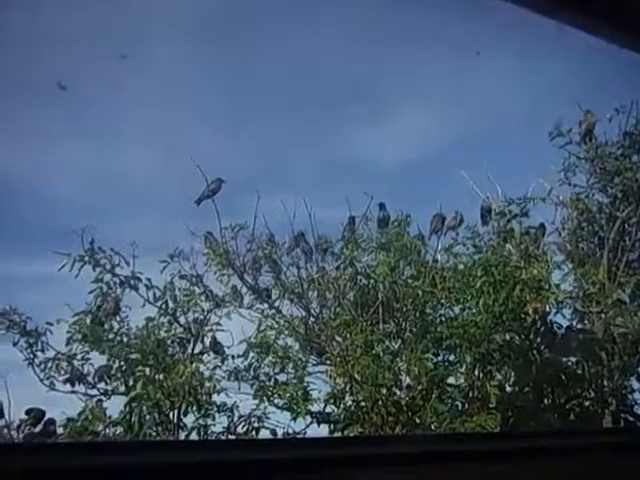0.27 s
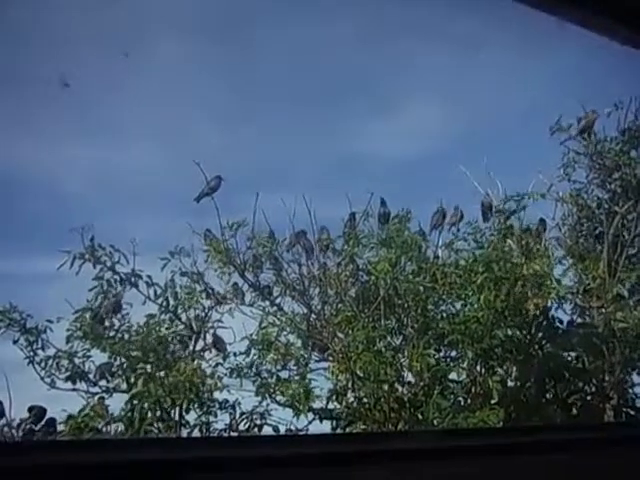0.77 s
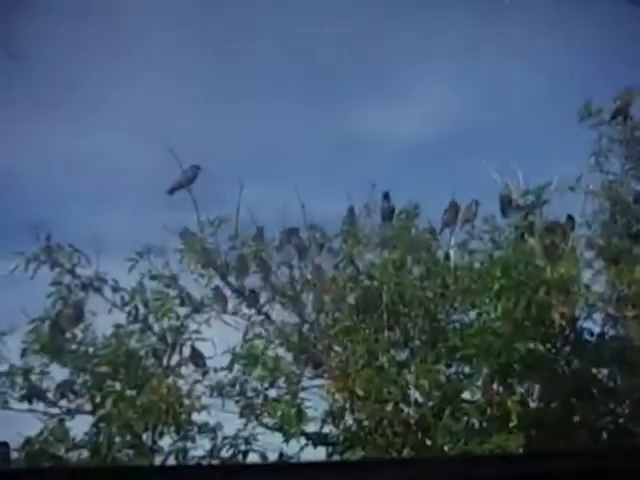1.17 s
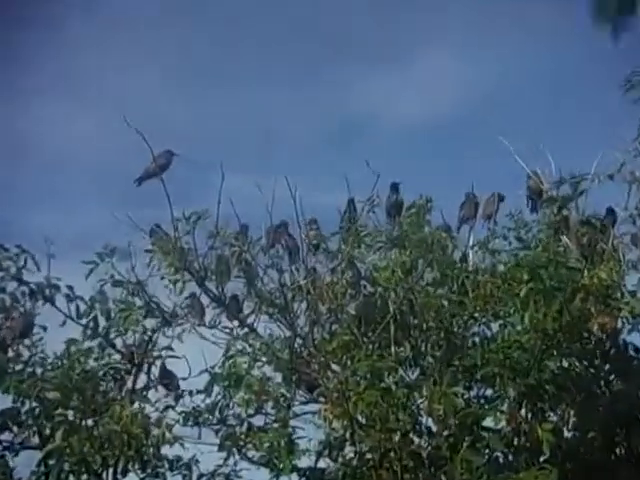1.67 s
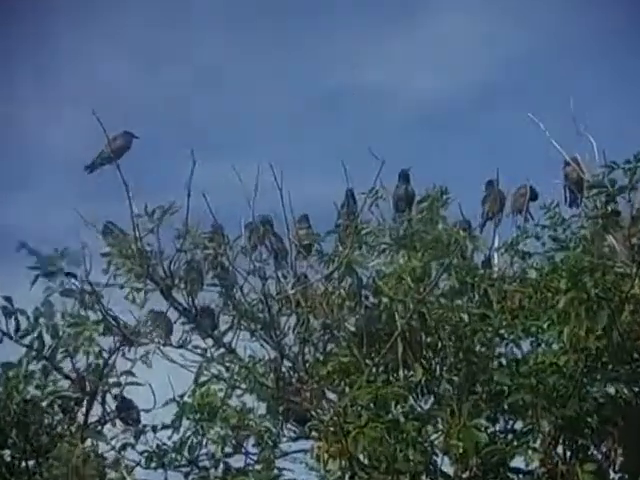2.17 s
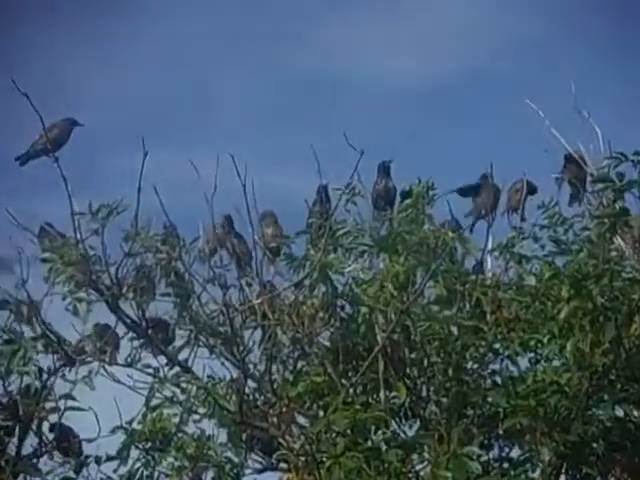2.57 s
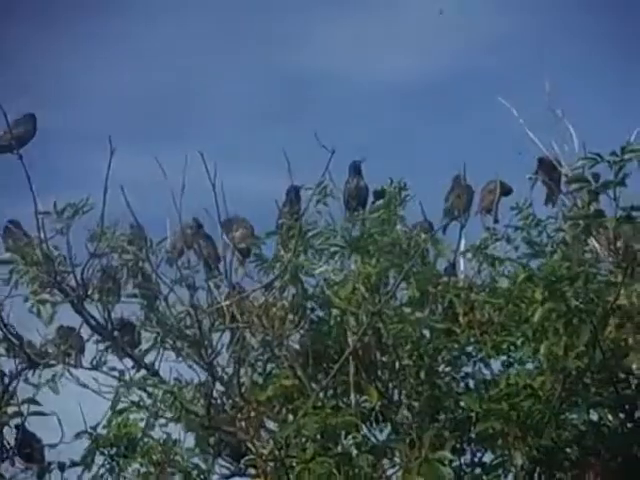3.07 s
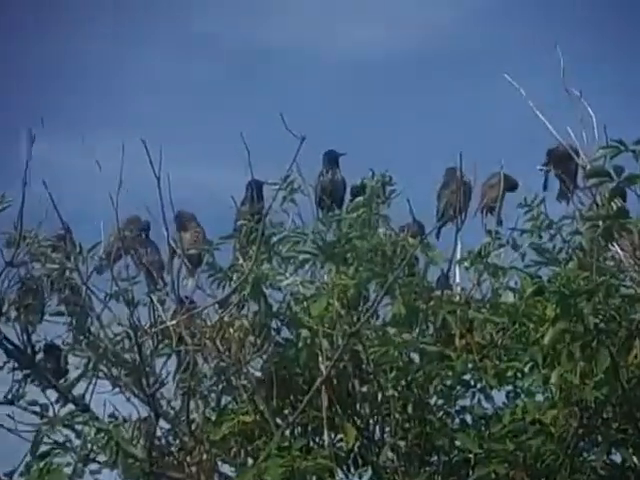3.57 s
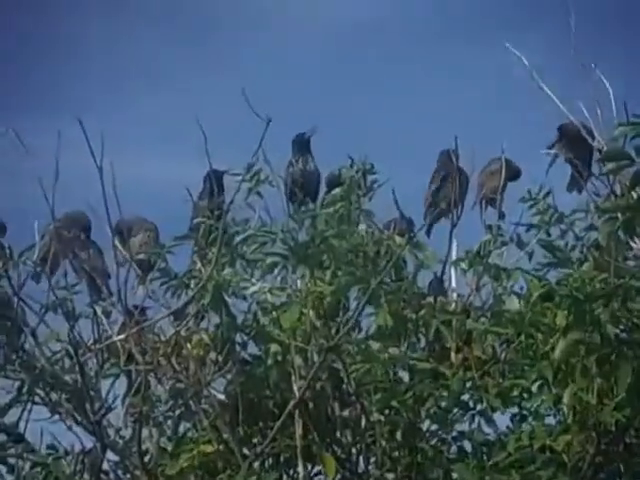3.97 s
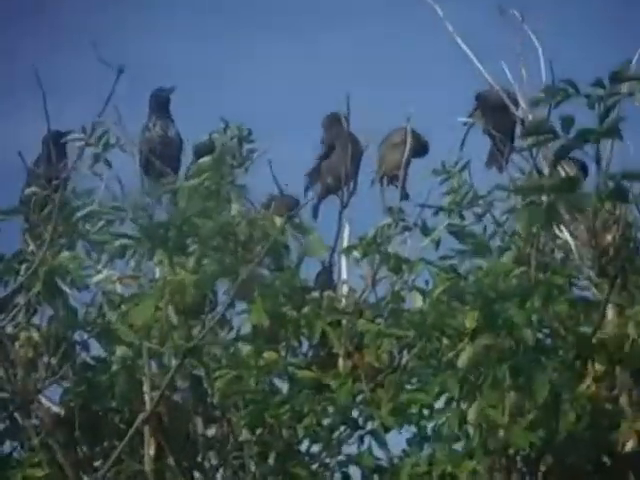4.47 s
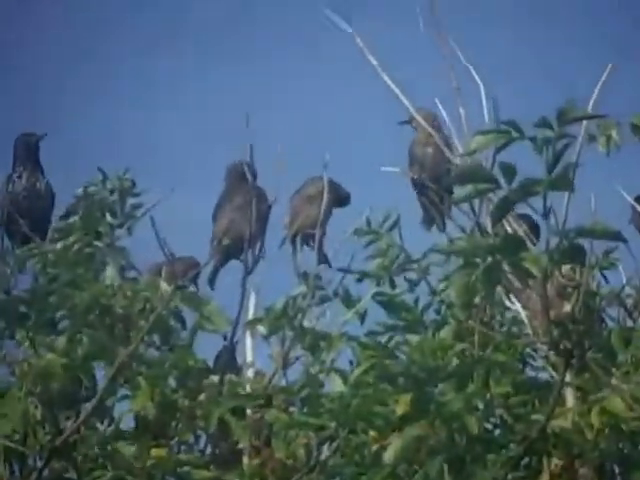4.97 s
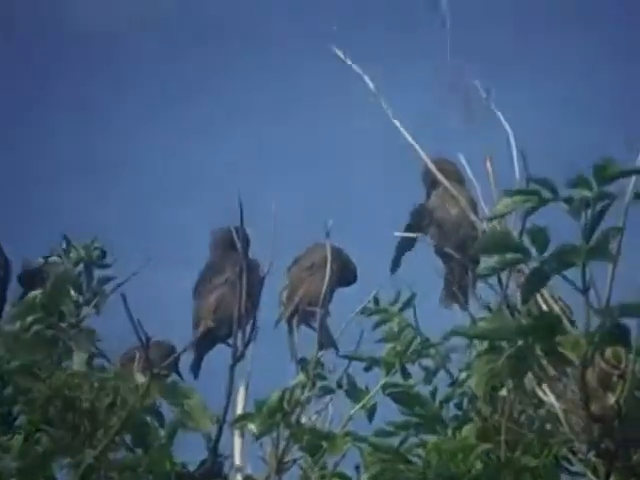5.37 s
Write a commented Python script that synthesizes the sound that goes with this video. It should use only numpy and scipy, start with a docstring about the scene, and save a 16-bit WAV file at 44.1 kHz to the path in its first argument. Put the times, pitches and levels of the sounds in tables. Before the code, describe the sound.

A large flock of starlings chatters in a bushy tree outdoors for the whole five and a half seconds. Countless short chirps blend into a dense, bright babble, slightly softened by the leaves. Thin high whistles, a few lower sliding whistles, harsh rasps and hoarse falling squawks stand out throughout. Underneath are a soft open-air rumble and a faint, low engine hum that weakens after about 3 seconds. Close to the single microphone, a hand-held camera knocks lightly between 0.2 and 0.4 seconds, with a sharp, loud button click at 0.4. Its zoom motor gives a very faint, thin, high whine from 1 to 2.5 seconds. More knocks come at 2.3 and 2.4 seconds, a second sharp click at 2.7, then knocks at 3.1, 3.4 and 3.8. After that the handling stops and the birds keep chattering to the end.

```python
"""In a bushy tree, a flock of starlings chatters: gliding whistles and harsh rasps over a babble of
many more birds. Modulation in the syrinx roughens the whistles, a throat resonance shapes the rasps,
and leaves scatter every call into weak echoes. An engine hums faintly under the rumble of open air.
Close to its single microphone, a hand-held camera knocks, clicks and whines as it zooms."""
import sys
import numpy as np
from scipy import signal
from scipy.fft import rfft, irfft
from scipy.io import wavfile
from scipy.ndimage import uniform_filter1d, minimum_filter1d

SR = 44100
rng = np.random.default_rng(int(sys.argv[2]) if len(sys.argv) > 2 else 0)


def persist_wave(psi):
    """Save psi, clipped to +-1, as 16-bit WAV."""
    counts = np.round(np.clip(psi, -1, 1) * 32767).astype(np.int16)
    wavfile.write(sys.argv[1], SR, np.atleast_2d(counts).T)


N = 247401
TIME = np.arange(N) / SR

# Relative levels of the flock's low and high bands: time_s, chatter_db, squeak_db
FLOCK_LEVELS = [(0.0, -32.5, -30), (0.22, -35.5, -38), (0.43, -33.5, -39.5), (0.69, -32.5, -31.5),
                (1.11, -35.5, -36.5), (1.72, -32, -33.5), (2.24, -33, -35), (2.4, -34, -34.5),
                (2.9, -36.5, -34.5), (3.21, -34.5, -36.5), (3.62, -35.5, -36.5), (3.84, -33, -35.5),
                (4.23, -32.5, -33), (4.93, -33, -35.5), (5.29, -36, -35), (5.6, -32, -37)]
# Spectral envelope of the flock: frequency_hz, gain_db
FLOCK_SPECTRUM = [(600, -18), (1000, -11), (1500, -14), (2100, -6.5), (2700, -1.5), (3400, -4), (5000, 2.5),
                  (6300, 1), (7800, 4.5), (9000, -3.5), (10300, -5.5), (12500, -7), (15000, -56)]
# Running state of the engine: time_s, firing_hz, fundamental_gain_db
ENGINE_STATE = [(0, 71.36, -2), (2.2, 71.3, 0.5), (3.6, 71.03, -10), (5.6, 69.67, -14)]
# Harmonics of the firing rate: order, base_level_db
ENGINE_ORDERS = [(1, -46), (2, -46.5), (3, -44)]
# Spectral envelope of open air and distant rumble: frequency_hz, gain_db
AIR_SPECTRUM = [(15, -2), (30, 5.5), (55, -0.5), (100, -5), (180, -9), (280, -10.5), (400, -17), (700, -22),
                (5000, -17), (11000, -36.5), (15500, -30.5)]
# Harsh calls: start_s, end_s, resonance_hz, level_db
RASP_CALLS = [(0.08, 0.152, 5180, -31), (0.088, 0.142, 7630, -34), (0.598, 0.642, 4690, -27),
              (0.601, 0.748, 6780, -33.5), (0.719, 0.769, 5470, -26), (1.053, 1.099, 4610, -28),
              (1.29, 1.44, 7570, -28.5), (2.091, 2.127, 4970, -27.5), (2.279, 2.396, 8480, -27.5),
              (3.171, 3.422, 3240, -36.5), (3.36, 3.447, 5980, -32), (3.697, 3.781, 7290, -25.5),
              (3.957, 4.097, 5730, -35), (4.209, 4.307, 2690, -31.5), (4.612, 4.712, 7100, -32),
              (4.803, 4.845, 6620, -29.5), (5.188, 5.316, 4870, -32.5), (5.215, 5.282, 7570, -28)]
# Hoarse falling calls: start_s, end_s, pitch_hz, fall_octaves, level_db
SQUAWK_CALLS = [(0.123, 0.15, 7300, 0.36, -27), (0.22, 0.256, 4680, .2, -37),
                (1.149, 1.23, 4570, 0.56, -39), (1.613, 1.642, 5720, 0.59, -24),
                (1.834, 1.937, 4560, 0.93, -27.5), (1.963, 2.002, 2780, .43, -34),
                (2.253, 2.399, 4920, 0.36, -29), (2.436, 2.517, 3600, 0.266, -35),
                (4.403, 4.498, 4220, 0.85, -26.5)]
# Clear low whistles, each a straight slide: start_s, end_s, pitch_hz, glide_hz, level_db
LOW_WHISTLES = [(0.469, 0.512, 1995, -380, -26.5), (1.143, 1.179, 1436, 75, -41.5),
                (1.561, 1.621, 3450, -360, -30.5), (2.241, 2.326, 2640, 60, -27.5),
                (3.048, 3.133, 1050, -90, -47), (3.612, 3.703, 2356, 253, -34),
                (4.549, 4.855, 1365, 288, -40), (4.832, 5.003, 1602, 230, -42),
                (5.501, 5.554, 1756, -380, -32.5)]
# Thin high whistles, each a shallow arch: start_s, end_s, pitch_hz, glide_hz, level_db, roughness_ratio
HIGH_WHISTLES = [(0.67, 1.0, 7830, -600, -33, 0.12), (0.739, 0.796, 7660, 802, -24.5, 0.17),
                 (1.071, 1.176, 9050, 450, -39.5, 0.53), (1.487, 1.625, 8270, 509, -29, 0.37),
                 (1.63, 1.756, 7960, 250, -27, 0.22), (1.767, 1.902, 8120, 500, -34, 0.46),
                 (1.957, 2.09, 9700, -400, -33, .3), (2.075, 2.398, 9150, -650, -32, 0.66),
                 (2.427, 2.526, 7840, 1303, -28.5, .05), (2.511, 2.626, 8000, 0, -31, 0.31),
                 (2.647, 2.749, 7200, -600, -25.5, 0.42), (2.762, 2.94, 9220, -350, -34.5, 0.7),
                 (2.786, 2.957, 8750, 702, -29.5, 0.29), (2.939, 3.055, 8750, -100, -28, 0.2),
                 (3.371, 3.425, 7030, -150, -26.5, 0.3), (3.541, 3.634, 8230, -1000, -27.5, 0.04),
                 (3.66, 3.811, 8570, -250, -27, .06), (3.772, 3.86, 8310, -280, -22, 0.26),
                 (3.838, 3.917, 8170, -100, -20, 0.22), (4.136, 4.339, 6990, 1286, -30, 0.43),
                 (4.438, 4.628, 8380, 509, -34, 0.34), (4.695, 4.827, 8170, 456, -34.5, .2),
                 (5.085, 5.192, 8600, 204, -37, 0.42), (5.29, 5.426, 8530, -80, -44.5, .05),
                 (5.496, 5.61, 8880, 304, -32.5, 0.38)]
# Modes of the camera's shell: frequency_hz, gain_db, t60_s
SHELL_MODES = [(482, -20.5, 0.057), (830, -13.5, 0.023), (1110, -7.5, 0.015), (1284, -11.5, 0.027),
               (2007, -7.5, 0.021), (3740, -6.5, 0.015)]
# Spectral envelope of a tick or snap on the camera: frequency_hz, gain_db
CONTACT_SPECTRUM = [(300, -25), (1500, -14), (3500, -7.5), (6000, -4.5), (8000, -1), (9500, -9),
                    (12000, -23.5), (16000, -32)]
# Impacts on the camera body: start_s, thump_gain_db, shell_gain_db, tick_gain_db
BODY_KNOCKS = [(0.2166, -26.5, -36, -35), (0.2724, -17, -23, -26), (0.397, -16, -15.5, -18),
               (2.264, -21, -8, -19.5), (2.4437, -16.5, -21.5, -18.5), (2.7567, -14.5, -17, -10),
               (3.1445, -13.5, -14.5, -15.5), (3.411, -11, -12.5, -12), (3.802, -11.5, -12.5, -11)]
# Presses of a camera button: start_s, gain_db
BUTTON_PRESSES = [(.3880, -1.5), (2.7372, -1.5)]
# Runs of the zoom motor: start_s, end_s, pitch_hz, level_db
ZOOM_RUNS = [(1.013, 1.407, 9640, -45.5), (1.409, 2.55, 8790, -44)]


def gain_of(db):
    """Amplitude ratio of a level in decibels."""
    return 10 ** (np.asarray(db) / 20)


def unit_rms(x):
    """Normalisation to an rms of 1."""
    return x / np.sqrt(np.mean(x ** 2) + 1e-20)


def add(mix, start_s, sound):
    """Superposition: a sound joins the mix at its start time."""
    part = mix[max(round(start_s * SR), 0):][:len(sound)]
    part += sound[:len(part)]


def coloured(x, envelope):
    """Spectral shaping by an envelope interpolated over log frequency."""
    hz, db = np.transpose(envelope)
    f = np.fft.rfftfreq(len(x), 1 / SR)
    return irfft(rfft(x) * gain_of(np.interp(np.log(f + 1), np.log(hz), db)), len(x))


def wander(rate_hz):
    """Random modulation: low-pass Gaussian noise of rms 1."""
    f = np.fft.rfftfreq(N, 1 / SR)
    return unit_rms(irfft(rfft(rng.standard_normal(N)) * np.exp(-.5 * (f / rate_hz) ** 2), N))


def phase_of(hz):
    """Phase in radians, the time integral of instantaneous frequency."""
    return 2 * np.pi * np.cumsum(hz) / SR


def span(start, end):
    """Sample indices of an event, and its normalised time u from 0 to 1."""
    first = round(start * SR)
    at = np.arange(first, max(round(end * SR), first + 64))
    return at % N, np.linspace(0, 1, len(at))


def foliage(x, t60_s, wet_db, echoes_per_s=2000):
    """Scattering: leaves and branches follow the direct sound with a decaying spray of echoes."""
    t = np.arange(SR // 4) / SR
    taps = rng.standard_normal(len(t)) * (rng.random(len(t)) < echoes_per_s / SR)
    taps *= gain_of(-60 * t / t60_s)
    taps *= gain_of(wet_db) / np.linalg.norm(taps)
    taps[0] = 1  # direct path
    return signal.fftconvolve(x, taps) / np.hypot(1, gain_of(wet_db))


def chirps(count=120, glide=0.225, spread_db=7, buzz_hz=190):
    """One group of birds chirps; amplitude and frequency modulation add buzzing sidebands."""
    out, tremble = np.zeros(N), wander(740)
    for when, pitch, length, slope, arch, rough, rate, size in rng.random((count, 8)):
        start = when * N / SR
        at, u = span(start, start + 0.0151 + .06 * length ** 2)
        centre_hz = 1300 + 8200 * pitch ** 1.35  # low voices are the most common
        bend = (2 * slope - 1.2) * (u - .5) - (arch - .3) * (u - .5) ** 2
        trill = np.sin(2 * np.pi * (60 + 240 * rate) * at / SR)
        hz = centre_hz * np.exp(glide * bend) + buzz_hz * rough * (trill + tremble[at])
        envelope = gain_of(spread_db * size) * (1 + rough * trill) * np.sin(np.pi * u)
        add(out, start, envelope * np.sin(phase_of(hz)))
    return out


def distant_rasps(patch_db=2, top_patch_db=9.5, flicker_db=1, cutoff_hz=9800):
    """Far rasps merge into patchy hiss; the leaves, a low-pass filter, pass its top only in flecks."""
    hz, _, spectra = signal.stft(rng.standard_normal(N), SR, nperseg=256, noverlap=192)
    patches = uniform_filter1d(rng.standard_normal(spectra.shape), size=7, axis=0)  # across frequency
    patches = unit_rms(uniform_filter1d(patches, size=22, axis=1))  # across time
    flicker = unit_rms(uniform_filter1d(rng.standard_normal(spectra.shape[1]), size=9))
    passed = 1 / np.hypot(1, (hz[:, None] / cutoff_hz) ** 6)
    depth_db = patch_db + top_patch_db * (0.5 - passed)
    spectra *= passed * gain_of(depth_db * patches + flicker_db * flicker)
    return unit_rms(signal.istft(spectra, SR, nperseg=256, noverlap=192)[1][:N])


def flock(groups=20, hiss_db=-3, crossover_hz=4000, squeak_lift_db=1.0):
    """Incoherent summation: independent groups of birds all over the tree blend into a babble."""
    voices = sum(foliage(chirps(), t60_s=0.35, wet_db=-2.5)[:N] for _ in range(groups))
    babble = coloured(unit_rms(voices) + gain_of(hiss_db) * distant_rasps(), FLOCK_SPECTRUM)
    low = signal.sosfiltfilt(signal.butter(4, crossover_hz, fs=SR, output="sos"), babble)
    times, chatter_db, squeak_db = np.transpose(FLOCK_LEVELS)
    chatter = unit_rms(low) * gain_of(np.interp(TIME, times, chatter_db))
    squeaks = unit_rms(babble - low) * gain_of(np.interp(TIME, times, squeak_db) + squeak_lift_db)
    return chatter + squeaks


def engine(waver=0.0026):
    """Periodic firing gives a harmonic series; its fundamental booms, then sinks away."""
    times, firing_hz, boom_db = np.transpose(ENGINE_STATE)
    phase = phase_of(np.interp(TIME, times, firing_hz) * (1 + waver * wander(4.8)))
    boom = gain_of(np.interp(TIME, times, boom_db))
    out = np.zeros(N)
    for order, db in ENGINE_ORDERS:
        rms = gain_of(db) * (boom if order == 1 else 1)
        out += np.sqrt(2) * rms * np.sin(order * phase + 2 * np.pi * rng.random())
    return out


def open_air(level_db=-42):
    """Stationary broadband noise, strongest in the bass, is heard as air and distant rumble."""
    return gain_of(level_db) * unit_rms(coloured(rng.standard_normal(N), AIR_SPECTRUM))


def from_perch(call, db, t60_s, wet_db):
    """A call scattered by leaves; its energy equals that of level db held for the call's length."""
    heard = foliage(call, t60_s, wet_db)
    return gain_of(db) * heard * np.sqrt(len(call)) / np.linalg.norm(heard)


def rasps(pulse_hz=170, depth=0.54, width_hz=790, sag=0.0608, upper_hz=10990, upper_db=-27.5):
    """Source and filter: puffs of noise excite a throat resonance that sinks as the beak closes."""
    out, noise = np.zeros(N), rng.standard_normal(N) + 1j * rng.standard_normal(N)
    skirt_hz_db = [(600, -29), (2500, -4.5), (5000, 2), (8500, -1.5),
                   (10500, -16.5), (12500, -31), (15000, -33)]
    skirt = gain_of(-8) * unit_rms(coloured(rng.standard_normal(N), skirt_hz_db))
    puffs = 1 + depth * np.sin(phase_of(pulse_hz * (1 + 0.18 * wander(8))))
    for start, end, hz, db in RASP_CALLS:
        at, u = span(start, end)
        band = signal.lfilter(*signal.butter(2, width_hz / 2, fs=SR), noise[at])
        # Two carriers shift the band to the throat resonance and a weak upper one.
        throat = np.exp(1j * phase_of(hz * (1 + sag * (.5 - u))))
        upper = gain_of(upper_db) * np.exp(2j * np.pi * upper_hz * at / SR)
        resonant = unit_rms((band * (throat + upper)).real)
        call = (resonant + skirt[at]) * puffs[at] * signal.windows.tukey(len(u), 0.3)
        add(out, start, from_perch(call, db, t60_s=0.088, wet_db=2))
    return out


def contour(start, end, glide, arch):
    """Pitch offset from mid-call: a linear glide plus a parabola that lowers both ends by arch."""
    from_middle = span(start, end)[1] - .5
    return glide * from_middle - arch * (2 * from_middle) ** 2


def tonal_calls(squawk_roughness=0.424, low_roughness=0.081):
    """Frequency contours of squawks and whistles: start_s, end_s, pitch_hz, level_db, roughness_ratio."""
    for start, end, hz, fall, db in SQUAWK_CALLS:
        octaves = contour(start, end, -fall, arch=-0.0296)  # the fall flattens towards its end
        yield start, end, hz * 2 ** octaves, db, squawk_roughness
    for start, end, hz, glide_hz, db in LOW_WHISTLES:
        yield start, end, hz + contour(start, end, glide_hz, arch=0), db, low_roughness
    for start, end, hz, glide_hz, db, roughness in HIGH_WHISTLES:
        yield start, end, hz + contour(start, end, glide_hz, arch=202), db, roughness


def whistles(quaver_hz=200, flutter_db=3, crescendo_db=1.5):
    """Frequency modulation by a trembling syrinx broadens gliding pure tones into rougher calls."""
    out, slow, fast, flutter = np.zeros(N), wander(35.4), wander(780), wander(100)
    for start, end, hz, db, roughness in tonal_calls():
        at, u = span(start, end)
        jitter_hz = np.interp(hz, [2000, 4000, 8000], [260, 520, 430])
        deviation_hz = roughness * (quaver_hz * slow[at] + jitter_hz * fast[at])
        swell = gain_of(flutter_db * flutter[at] + crescendo_db * (u - .5))
        call = swell * signal.windows.tukey(len(u), .38) * np.sin(phase_of(hz + deviation_hz))
        add(out, start, from_perch(call, db, t60_s=0.17, wet_db=-2))
    return out


def shell_ring(t):
    """Free vibration of the camera's shell: a sum of exponentially damped modes."""
    return sum(gain_of(db - 60 * t / t60) * np.sin(2 * np.pi * hz * t) for hz, db, t60 in SHELL_MODES)


def contact_noise(t, t60_s):
    """A brief contact has a broad spectrum: a bright burst of decaying noise."""
    return unit_rms(coloured(rng.standard_normal(len(t)), CONTACT_SPECTRUM)) * gain_of(-60 * t / t60_s)


def knocks(thump_hz=220, thump_t60_s=0.0072, low_cut_hz=85):
    """Structure-borne sound: each impact jolts the microphone, rings the shell and adds a gritty tick."""
    out, t = np.zeros(N), np.arange(4096) / SR
    shell = shell_ring(t)
    jolt = -2.5 * np.sin(2 * np.pi * thump_hz * t) * gain_of(-60 * t / thump_t60_s)
    thump = signal.lfilter(*signal.butter(2, low_cut_hz, "high", fs=SR), jolt)
    for start, thump_db, shell_db, tick_db in BODY_KNOCKS:
        tick = contact_noise(t, t60_s=0.014)
        add(out, start, gain_of(thump_db) * thump - gain_of(shell_db) * shell + gain_of(tick_db) * tick)
    return out


def button_clicks(ring_db=-11):
    """Impulsive excitation: a button snaps brightly and weakly drives the shell's modes."""
    out, t = np.zeros(N), np.arange(4096) / SR
    ring = gain_of(ring_db) * shell_ring(t)
    for start, db in BUTTON_PRESSES:
        add(out, start, gain_of(db) * (2 * contact_noise(t, t60_s=0.01) + ring))
    return out


def zoom_motor(waver=0.002):
    """Rotation rate sets frequency: the lens motor holds one thin, high tone for each speed."""
    out, unsteady = np.zeros(N), wander(60)
    for start, end, hz, db in ZOOM_RUNS:
        at, _ = span(start, end)
        tone = np.sin(phase_of(hz * (1 + waver * unsteady[at])))
        add(out, start, gain_of(db) * unit_rms(tone * signal.windows.tukey(len(at), .1)))
    return out


def scene():
    """Sound pressures add at one microphone, which feeds both channels."""
    mono = flock() + engine() + open_air() + rasps() + whistles()
    mono += knocks() + button_clicks() + zoom_motor()
    return np.array([mono, mono])


def record(dry, ceiling=.88, cutoff_hz=16000):
    """Peak limiting holds down the loudest clicks; a low-pass filter then bounds the bandwidth."""
    allowed_gain = np.minimum(1, ceiling / (abs(dry) + 1e-9))
    limited = dry * uniform_filter1d(minimum_filter1d(allowed_gain, size=7), size=7)
    low_pass = signal.firwin(511, cutoff_hz, window=("kaiser", 9), fs=SR)
    return signal.oaconvolve(limited, low_pass[None], "same")


dry = scene()
out = record(dry)
persist_wave(out)
```